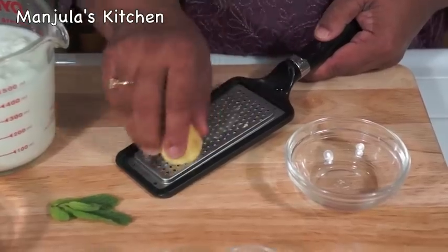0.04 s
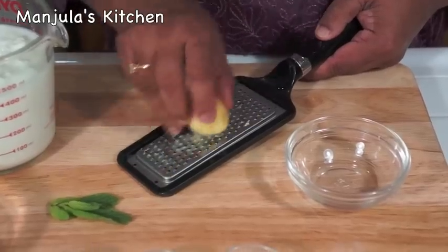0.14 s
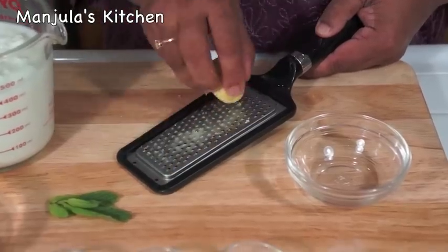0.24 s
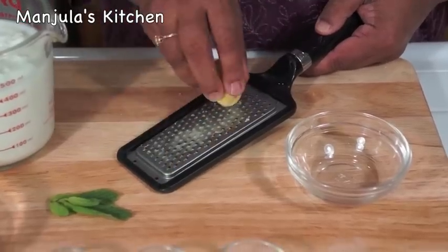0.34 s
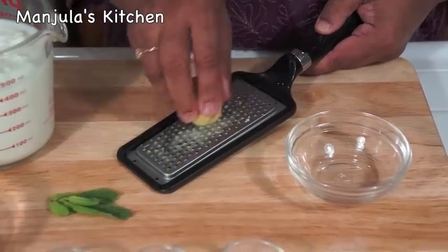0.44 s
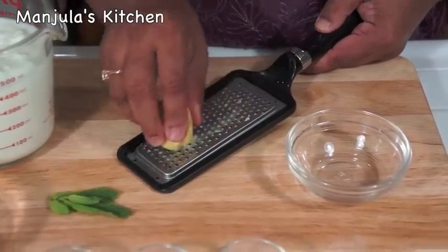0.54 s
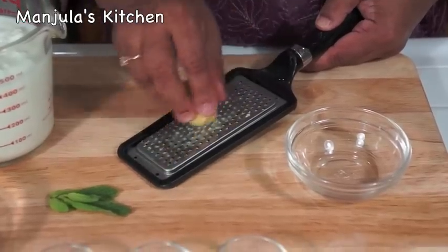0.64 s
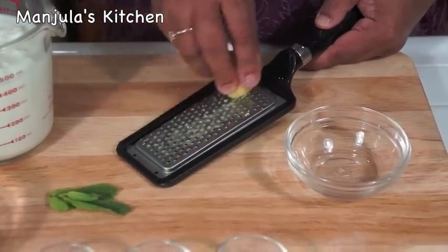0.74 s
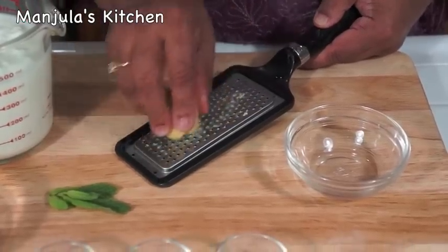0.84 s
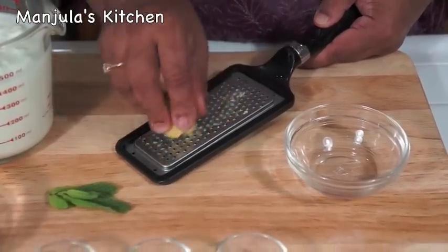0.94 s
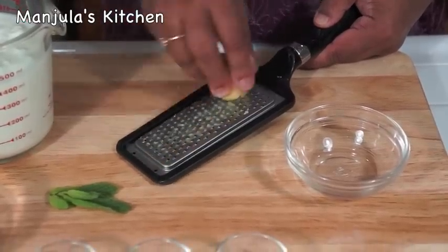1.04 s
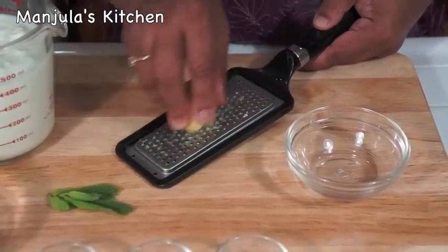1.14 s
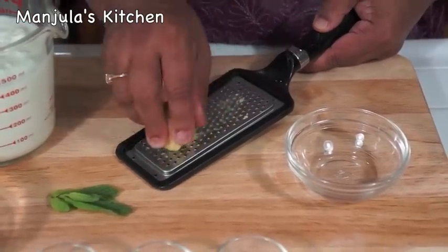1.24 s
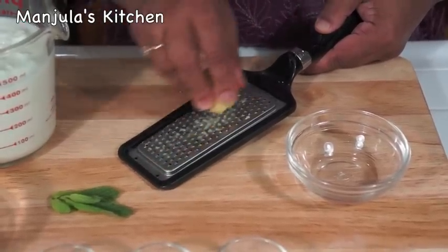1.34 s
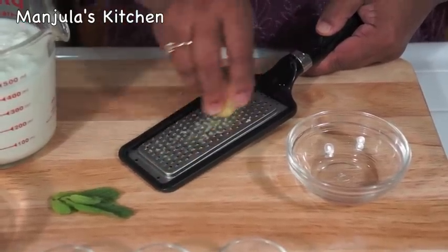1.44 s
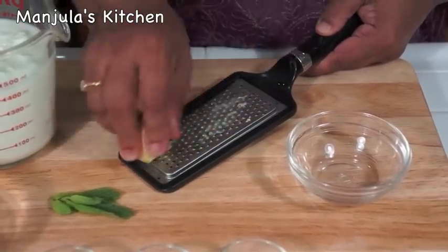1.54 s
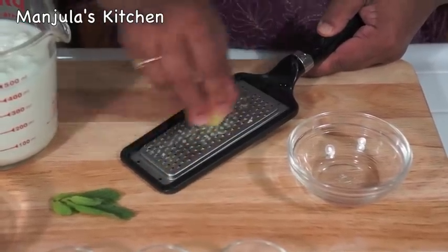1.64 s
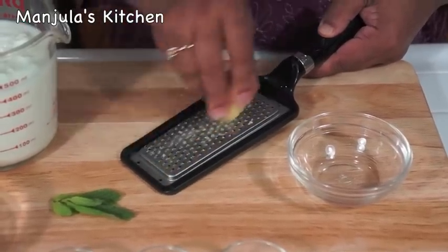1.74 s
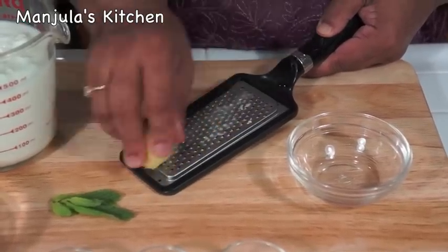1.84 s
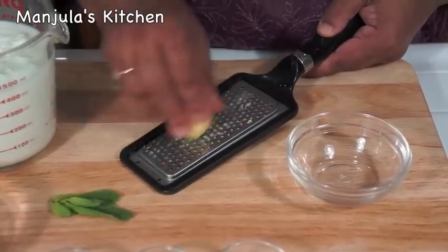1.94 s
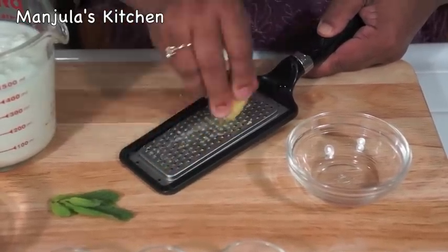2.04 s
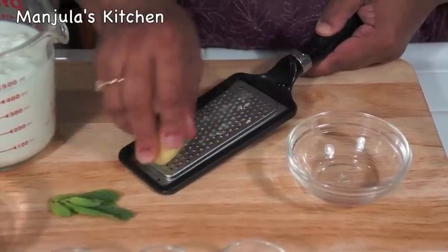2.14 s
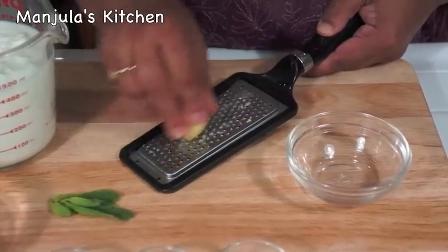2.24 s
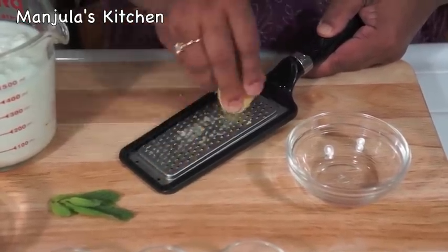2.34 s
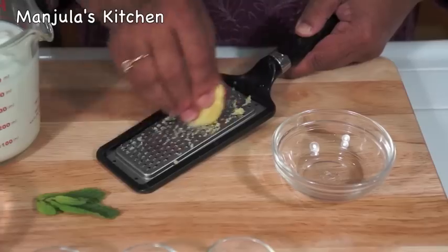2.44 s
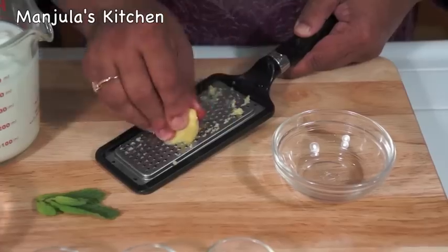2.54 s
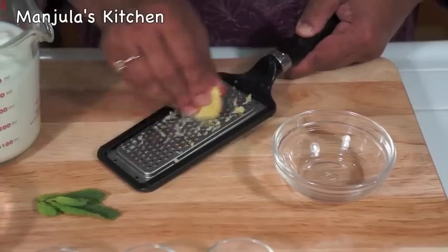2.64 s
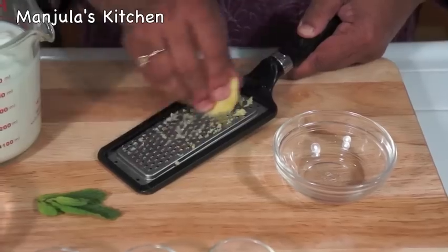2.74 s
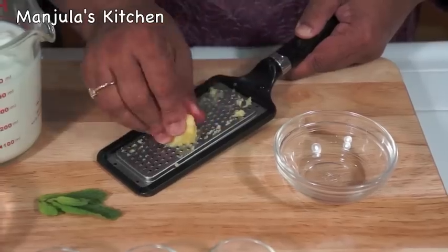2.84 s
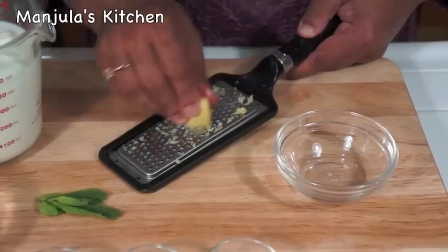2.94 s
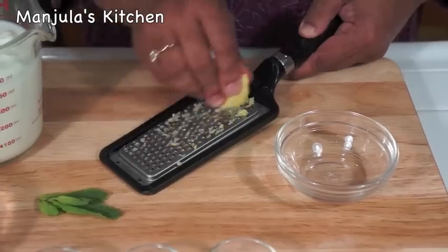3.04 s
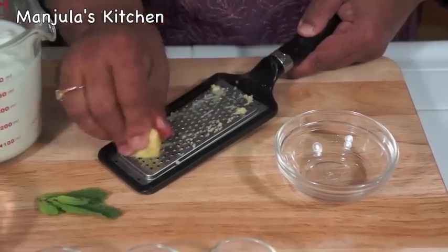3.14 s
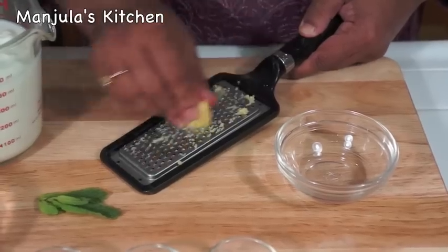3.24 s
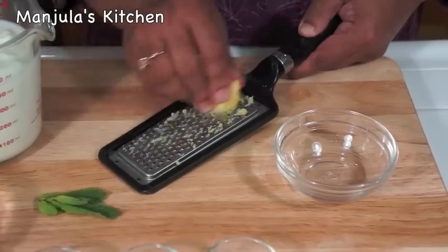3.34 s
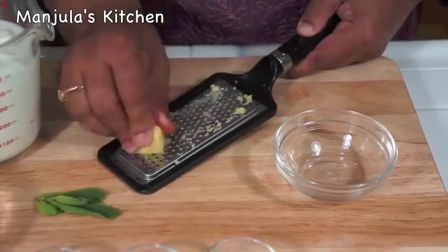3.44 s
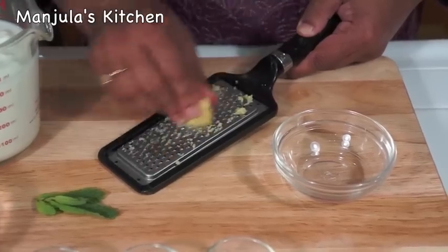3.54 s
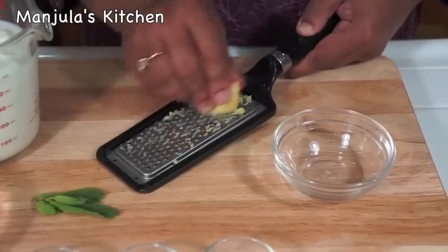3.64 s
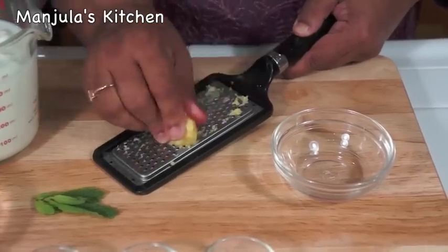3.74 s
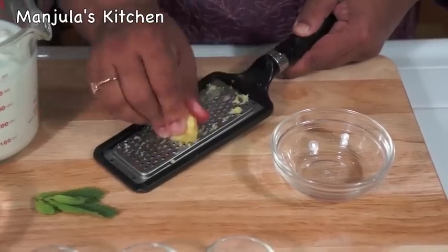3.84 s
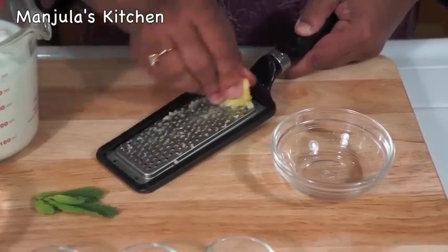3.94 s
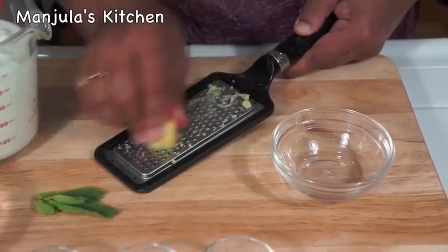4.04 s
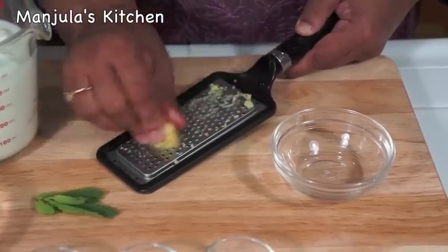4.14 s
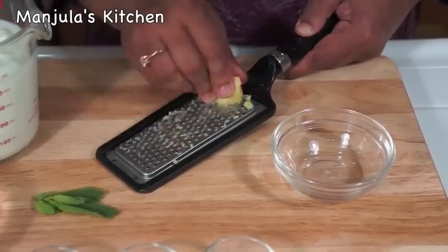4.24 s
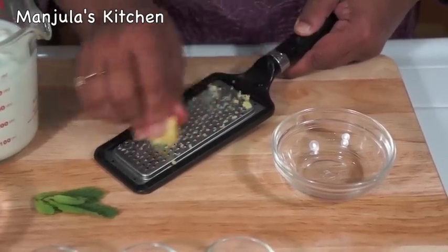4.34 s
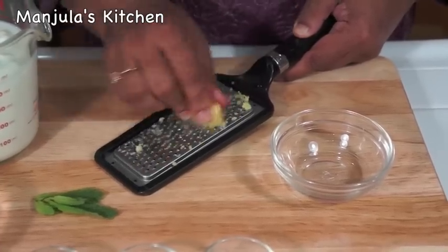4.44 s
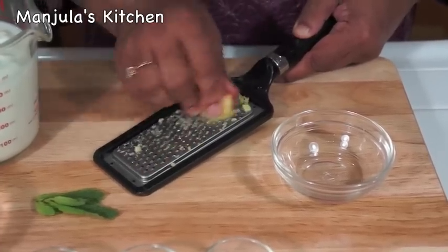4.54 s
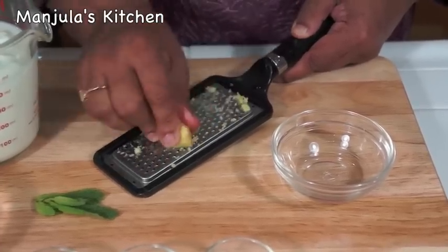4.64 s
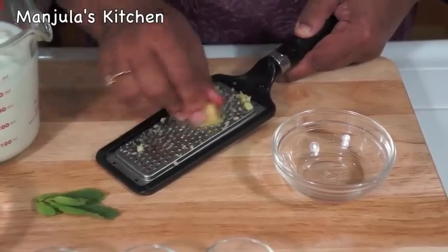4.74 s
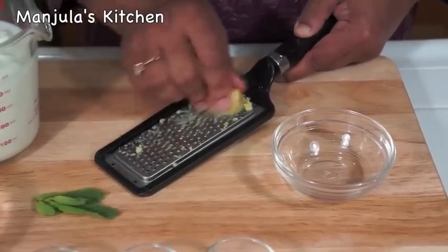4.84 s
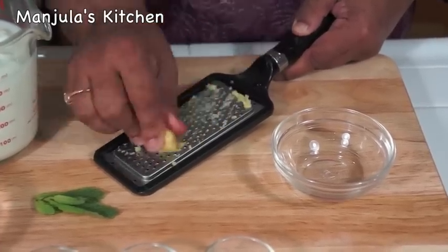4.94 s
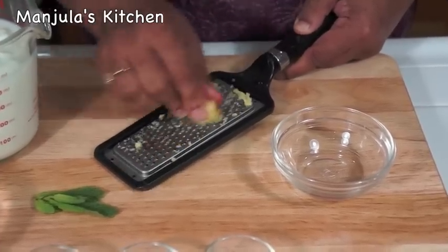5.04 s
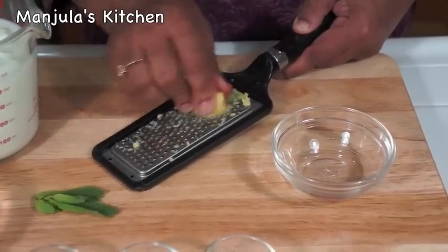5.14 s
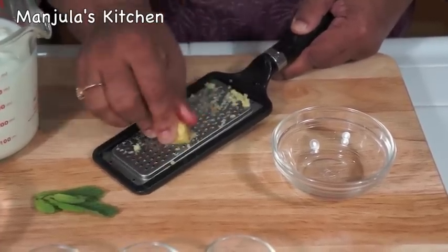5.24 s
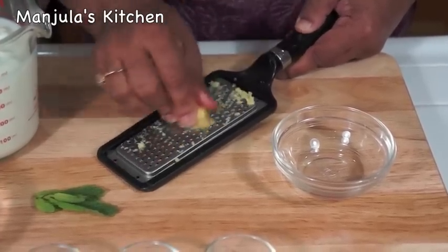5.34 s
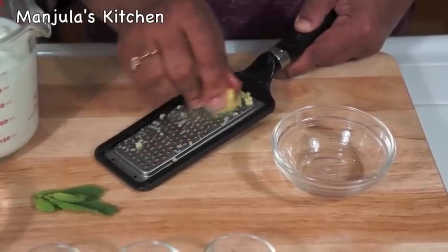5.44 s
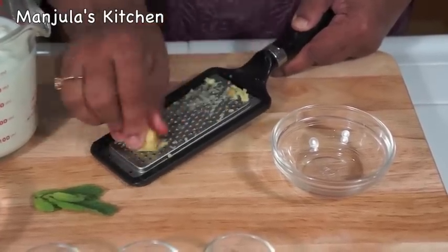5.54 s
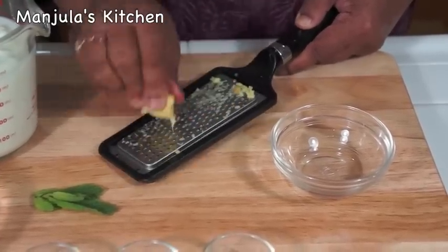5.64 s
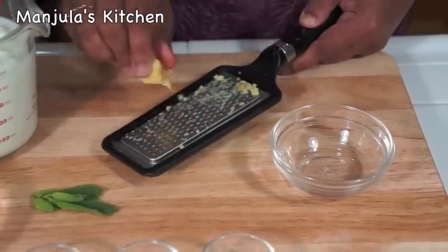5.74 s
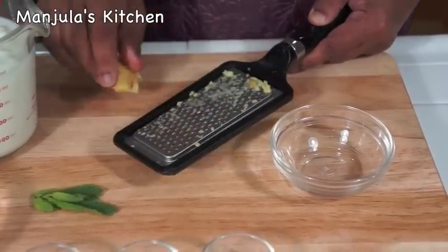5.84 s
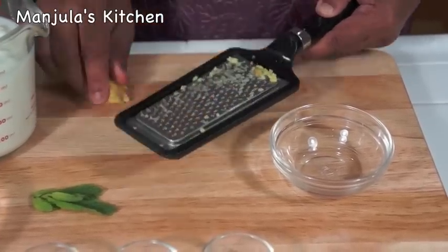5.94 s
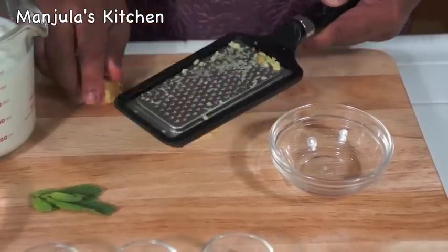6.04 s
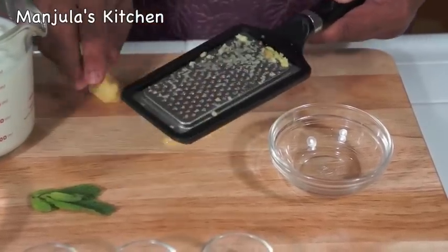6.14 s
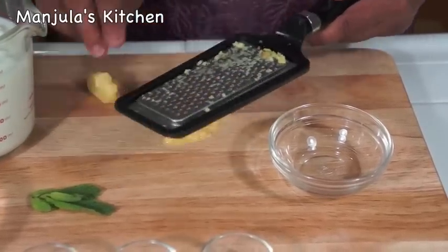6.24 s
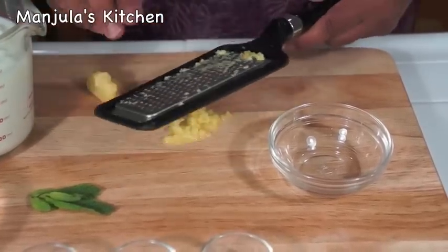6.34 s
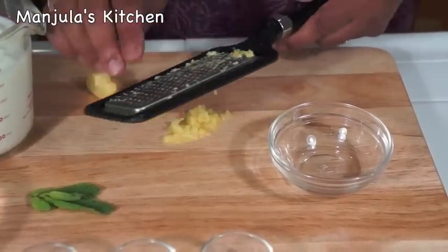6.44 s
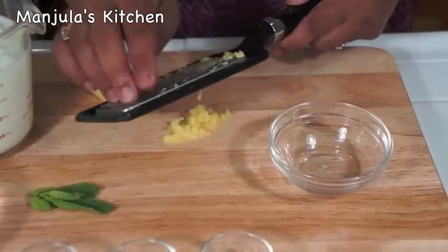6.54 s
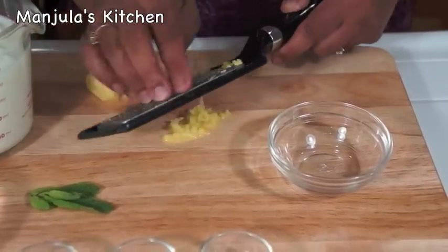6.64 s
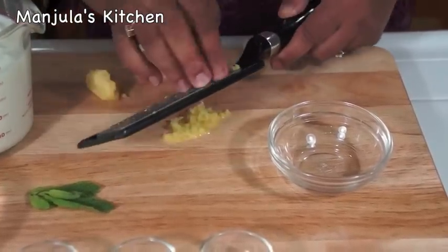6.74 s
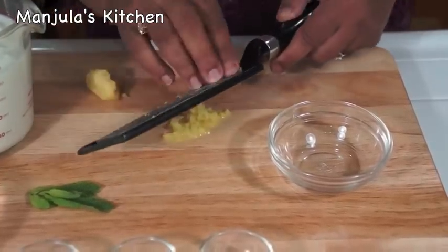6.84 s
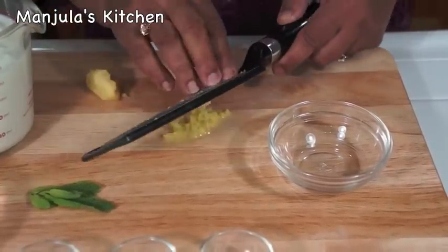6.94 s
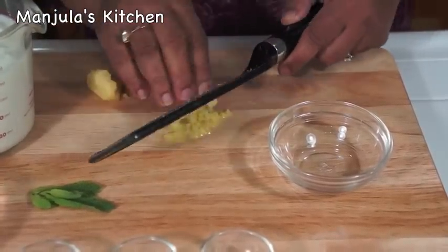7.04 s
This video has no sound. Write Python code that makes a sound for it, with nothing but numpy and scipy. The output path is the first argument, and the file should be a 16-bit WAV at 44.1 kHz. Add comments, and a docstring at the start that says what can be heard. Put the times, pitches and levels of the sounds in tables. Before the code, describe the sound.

In a small quiet kitchen, close stereo microphones catch ginger being rubbed on a fine steel rasp whose tip rests on a wooden board. From 0 to 2.4 seconds, short gritty scrapes come about every third of a second, with lighter grazes between and sharp metallic knocks near 0.07, 1.4, 2.0 and 2.3. The sound dips very briefly at 2.5. From 2.7 to 5.5 the strokes are stronger and fuller, back and forth almost continuously, with dense ticking fibres, bright tinny ringing and a slight low thud; another tiny dip falls near 4.45. Knocks mark 4.9 and 5.5, then a hollow bump at 5.63. Scraping stops; faint board touches follow around 5.8 to 6.15 over soft hiss with barely audible thin whines. From 6.7 to the end near 7, fingers faintly brush and click on the lifted metal.

```python
"""Ginger on a steel rasp

A piece of ginger is rubbed down and up a fine steel rasp whose tip rests on a wooden board, in a small kitchen.
Teeth tear fibres in dense random ticks that ring modes of board, frame, plate and teeth; the root knocks as it lands.
Then the rasp is lifted and fingers brush its back, over a quiet filtered-noise hiss with two thin whines."""
import sys
import numpy as np
from scipy import signal
from scipy.fft import rfft, irfft, next_fast_len
from scipy.io import wavfile
from scipy.ndimage import uniform_filter1d

SR = 44100
rng = np.random.default_rng(int(sys.argv[2]) if len(sys.argv) > 2 else 0)


def natural_amplitude(level_db):
    """Convert a level in decibels to a linear amplitude factor, elementwise."""
    exponent = np.asarray(level_db, float) / 20
    return 10 ** exponent


def to_wav(sig):
    """Store sig (one row per channel, or 1-D mono) as 16-bit WAV at the path in sys.argv[1].

    Samples outside -1..1 are clipped; the rate is SR.
    """
    pcm = np.clip(np.atleast_2d(sig), -1, 1) * 32767
    pcm = np.round(pcm).astype(np.int16)
    wavfile.write(sys.argv[1], SR, pcm.T)  # frames by channels


N = 312326
TIME = np.arange(N) / SR
SIZE = next_fast_len(N + SR)
FREQ = np.arange(SIZE // 2 + 1) * SR / SIZE + 1e-3

# root or fingers striking the rasp; levels before offsets:
# start_s, teeth_db, frame_and_board_db, contact_ms, ping_hz
KNOCKS = [(0.0686, -14, -30, 2.6, 1250), (0.3984, -38, -68, 2.2, 7120), (0.4383, -27, -37, 2.9, 2930),
          (0.7083, -36, -57, 1.5, 2440), (1.0564, -40, -66, 2.5, 8370), (1.1066, -30.5, -36, 5.2, 2600),
          (1.4206, -9.5, -31, 4.8, 6490), (1.6955, -30, -42, 2.7, 2500), (2.0321, -7, -30, 2.5, 6645),
          (2.3311, -5, -26.5, 2.57, 6500), (2.7422, -36, -44.5, 2.5, 8160), (4.4803, -32.5, -53, 3.4, 2450),
          (4.5506, -44, -43, 3.6, 6790), (4.883, -17, -38.5, 2.8, 2450), (5.5174, -11, -36, 1.6, 2620),
          (5.6291, -32, -35, 2.8, 1340), (6.6942, -43, -64, 7.4, 1940), (6.7391, -44, -62, 3.7, 2550),
          (6.8912, -35, -60.5, 2.3, 8820), (6.939, -30, -69, 2.2, 7000), (6.898, -44, -66, 1.7, 9000),
          (6.946, -36, -67, 1.3, 8150), (6.9571, -28, -61, 1.8, 6730), (6.964, -34, -66, 1.3, 6860),
          (6.9853, -34, -56, 1.8, 3200)]
LIFT_S = 6.3  # the rasp leaves the board
LIFTED_BOARD_DB = -21  # board modes are hardly driven from then on


def unit(x):
    """Scale to rms 1."""
    return x / np.sqrt(np.mean(np.abs(x) ** 2))


def shape(points):
    """Gain over frequency from (Hz, dB) points."""
    hz, db = np.transpose(points)
    return natural_amplitude(np.interp(np.log(FREQ), np.log(hz), db))


def through(x, response):
    """Filter by a frequency response."""
    return irfft(rfft(x, SIZE) * response, SIZE)[..., :N]


def causal(gain):
    """Minimum-phase response with the given gain, by folding the cepstrum."""
    fold = irfft(np.log(gain + 1e-9), SIZE)
    fold[1:SIZE // 2] *= 2
    fold[SIZE // 2 + 1:] = 0
    return np.exp(rfft(fold))


def ringing(modes):
    """Response of damped modes (Hz, width Hz, dB), neighbours in opposite phase."""
    total = 0
    for k, (hz, width_hz, db) in enumerate(modes):
        damping = 1j * FREQ * width_hz
        total = total + (-1) ** k * natural_amplitude(db) * damping / (hz ** 2 - FREQ ** 2 + damping)
    return total


def walk(rate_hz):
    """Smoothed random steps, rate_hz of them a second, rms 1."""
    k = int(SR / rate_hz)
    steps = np.repeat(rng.standard_normal(N // k + 1), k)
    return unit(uniform_filter1d(steps, k)[:N])


def tail(t60_s):
    """Room response: a fading burst of noise with unit energy."""
    t = np.arange(SR) / SR
    burst = rng.standard_normal(SR) * np.exp(-np.log(1000) * t / t60_s)
    return rfft(burst / np.sqrt(np.sum(burst ** 2)), SIZE)


def kitchen():
    """Steady noise hiss, side level set by frequency, plus two narrow-band noise whines that waver."""
    # hiss spectrum: hz, relative_density_db
    hiss = [(24, -58), (40, -15), (75, -17.5), (126, -10), (156, -15.5), (310, -4), (540, -7.5), (950, -8),
            (1550, -9.5), (2320, -12), (5270, -15), (9000, -14), (10300, -18.5), (11200, -24)]
    # hiss stereo width: hz, side_minus_mid_db
    hiss_side = [(60, -8), (110, -16), (190, -12), (350, -9), (620, -4), (1110, -5.5), (1990, -3.5),
                 (3570, -3.5), (6410, -4.5), (11500, 0.5)]
    # whines, lower then upper: hz, width_hz
    whines = [(4330, 240), (9630, 45)]
    # the lower whine comes and goes, the upper holds: time_s, lower_db, upper_db
    waver = [(0, -80, -82), (5.75, -75, -80), (6.0, -75, -78), (6.06, -90, -78), (6.12, -75, -78),
             (6.4, -80, -80), (6.6, -90, -82), (6.9, -92, -82)]
    mid, side = (through(rng.standard_normal(N), shape(hiss)) for _ in range(2))
    side = through(side, shape(hiss_side))
    scale = natural_amplitude(-66.5) / np.std(mid)  # mid rms, dB
    time_s, *levels = np.transpose(waver)
    whine = 0
    for (hz, width_hz), db in zip(whines, levels):
        narrow = through(rng.standard_normal(N), ringing([(hz, width_hz, 0)]) ** 2)
        whine = whine + natural_amplitude(np.interp(TIME, time_s, db)) * unit(narrow)
    return scale * np.array([mid + side, mid - side]) + whine


def low_thud(force):
    """The teeth's tearing and knocks also stir a low thud in two modes, near 73 and 157 Hz."""
    # thud modes: hz, width_hz, relative_db
    thuds = [(72.6, 23, 0), (157, 96, -2)]
    return natural_amplitude(-46.5) * rfft(force, SIZE) * unit(ringing(thuds) ** 2)


def thumps():
    """Rasp and root touch the bare board: a short rough contact through three broad resonances."""
    # start_s, level_db, ring_hz, t60_s
    touches = [(5.629, -37, 1350, 0.11), (5.803, -63, 1020, 0.11), (5.967, -55.5, 530, 0.2),
               (5.978, -57.5, 605, 0.16), (6.137, -56, 570, 0.18)]
    out = 0
    for at, db, hz, t60_s in touches:
        t = np.maximum(TIME - at, 0)
        fade = np.exp(-np.log(1000) * t / t60_s) * np.minimum(t / 0.0014, 1)
        push = rng.choice([-1, 1], size=N) * fade
        modes = [(hz, 0.41 * hz, 0), (0.58 * hz, 0.22 * hz, -8), (2.76 * hz, hz, -10)]
        out = out + natural_amplitude(db) * rfft(push, SIZE) * unit(ringing(modes) ** 2)
    return out


def pings():
    """Each blow rings the patch of steel right under it: a sine decaying in a few milliseconds."""
    out, t = np.zeros(N + SR), np.arange(1200) / SR
    for at, teeth_db, _, ms, hz in KNOCKS:
        i = int(at * SR)
        envelope = np.exp(-t / (ms / 1000)) * np.minimum(t / 0.0011, 1)
        out[i:i + len(t)] += natural_amplitude(teeth_db - 9) * np.sin(2 * np.pi * hz * t) * envelope
    return rfft(out, SIZE)


def free_plate(force):
    """Off the board the plate rings with fewer, other modes."""
    # hz, width_hz, relative_db
    free = [(1840, 95, -1), (2550, 120, -4), (3600, 300, -10.5), (5070, 200, -9.5)]
    return rfft(force, SIZE) * unit(ringing(free))


def spread(hiss, weight_db):
    """One contact drives board, frame, plate and teeth according to the weight on it."""
    # part of the weight reaching board, frame, plate: ratio
    shares = [1.05, 0.95, 0.13]
    # offset of board, frame, plate: offset_db
    offsets = [-1, -1.5, -3]
    levels = [share * weight_db + db for share, db in zip(shares, offsets)]
    return hiss * natural_amplitude(np.array(levels + [np.zeros(N)]))


def cuts():
    """Power of the cutting strokes: a cut bites, holds, lets go, and leaves a faint slower drag."""
    # start_s, length_s, tooth_hiss_db, release_db_per_s, frame_and_board_weight_re_hiss_db
    cutting = [(-0.088, 0.13, -36.5, 155, -0.5), (0.41, 0.122, -38.5, 187.0, -3.6),
               (0.771, 0.089, -34.5, 186.0, -5), (1.103, 0.092, -36, 182, -4.5),
               (1.418, 0.13, -36, 212, -2.5), (1.739, 0.11, -35, 237, -3.8), (2.029, 0.14, -37, 241, -2.9),
               (2.328, 0.089, -36, 306, -3.5), (2.737, 0.082, -31, 222, -1.9),
               (3.058, 0.069, -30.5, 176, -5.5), (3.343, 0.098, -33, 311, -4.5),
               (3.646, 0.066, -30, 224.5, -4), (3.994, 0.099, -33, 273.0, -5.5),
               (4.283, 0.088, -32.5, 379.0, -6), (4.543, 0.079, -32, 245, -6),
               (4.846, 0.084, -31.5, 210, -8.7), (5.138, 0.088, -32.5, 234, -10),
               (5.454, 0.092, -33.5, 250, -9.5)]
    bite_s, bite_curve, bite_db, landing_bite_db, landing_s = 0.04, 2.03, -22, -10, 0.005
    drag_db, drag_db_per_s = -22, 56
    # until lands_until_s the root is lifted and set down, weight and all; later the weight arrives late
    lands_until_s, landed_load_db, late_load_db, load_s = 2.49, -2, -9.5, 0.082
    linger_db_per_s, linger_most_db = 9, 0.3  # weight stays on while the teeth let go
    power = np.zeros((4, N))
    for start, length, db, release, weight_db in cutting:
        t = TIME - start
        after = np.maximum(t - length, 0)
        # a cut beginning on a knock starts stronger
        landing = any(abs(knock[0] - start) < landing_s for knock in KNOCKS)
        first_db = landing_bite_db if landing else bite_db
        bite = first_db * np.clip(1 - t / bite_s, 0, 1) ** bite_curve
        fall = np.hypot(natural_amplitude(-release * after), natural_amplitude(drag_db - drag_db_per_s * after))
        hiss = (t > 0) * natural_amplitude(db + bite) * fall
        first_load_db = late_load_db if start > lands_until_s else landed_load_db
        load_db = first_load_db * np.clip(1 - t / load_s, 0, 1)
        load_db = load_db + np.minimum(linger_db_per_s * after, linger_most_db)
        power += spread(hiss, weight_db + load_db) ** 2
    return power


def grazes():
    """Power of light grazes of the root on its way back, then of fingers: each swells and fades."""
    # peak_s, rise_s_per_20_db, fall_s_to_minus_20_db, hiss_db, weight_db
    brushes = [(0.412, 0.038, 0.044, -47, -18), (0.725, 0.028, 0.063, -46, -10.9),
               (1.06, 0.0081, 0.1, -48.5, -16), (1.702, 0.026, 0.08, -42, 3),
               (2.496, 0.016, 0.228, -42, -0.6), (2.696, 0.15, 0.072, -44, -14),
               (3.014, 0.1, 0.08, -39.5, -15), (3.302, 0.16, 0.05, -37.0, -7.5),
               (3.602, 0.25, 0.08, -40, -6.4), (3.949, 0.084, 0.24, -43.1, -6.5),
               (4.236, 0.17, 0.1, -37.5, -6), (4.486, 0.037, 0.1, -49.5, -9),
               (4.801, 0.11, 0.07, -39, -13.0), (5.096, 0.17, 0.04, -38.5, -15.5),
               (5.407, 0.106, 0.0838, -42, -13.5), (5.633, 0.081, 0.18, -59, 13.5),
               (6.746, 0.12, 0.13, -60.5, -4), (6.96, 0.062, 0.131, -53.4, -13),
               (7.03, 0.121, 0.2, -56, -25), (7.046, 0.015, 0.031, -47.5, -36)]
    power = np.zeros((4, N))
    for peak, rise, fall, db, weight_db in brushes:
        t = TIME - peak
        away = np.where(t < 0, -t / rise, (np.abs(t) / fall) ** 0.8)
        power += spread(natural_amplitude(db - 20 * away), np.full(N, weight_db)) ** 2
    return power


def strokes():
    """Strength of the tearing on board, frame, plate and teeth."""
    strength = np.sqrt(cuts() + grazes())
    strength[0] *= np.where(TIME > LIFT_S, natural_amplitude(LIFTED_BOARD_DB), 1)
    return strength


def tearing(rate_hz, spread_db):
    """Teeth catch fibres at random moments with uneven force."""
    catch = rng.random(N) < rate_hz / SR
    force = natural_amplitude(spread_db * np.minimum(rng.exponential(size=N), 5.5))
    return unit(catch * force * rng.choice([-1, 1], size=N))


def add_knocks(forces):
    """A knock is a rattle of contact, gone in milliseconds; the slow modes feel it as one push."""
    plate_like_teeth = 0.38  # the plate takes a blow between what teeth and frame take
    t = np.arange(1200) / SR
    for at, teeth_db, frame_db, ms, _ in KNOCKS:
        envelope = np.exp(-t / (ms / 1000)) * np.minimum(t / 0.00082, 1)
        rattle = rng.choice([-1, 1], size=(2, len(t))) * envelope
        i = int(at * SR)
        plate_db = frame_db + plate_like_teeth * (teeth_db - frame_db)
        fast = natural_amplitude(np.array([plate_db - 1.5, teeth_db - 13]))
        forces[2:, :, i:i + len(t)] += fast[:, None, None] * rattle
        board_db = frame_db + 24.7 + LIFTED_BOARD_DB * (at > LIFT_S)
        forces[:2, :, i + 20] += natural_amplitude(np.array([board_db, frame_db + 24]))[:, None]


def contacts():
    """Forces on board, frame, plate and teeth; of each a pair, since different teeth reach mid and side."""
    # the holding hand shifts the load: time_s, frame_over_board_db
    grip = [(0.1, 4.5), (0.8, 3), (1.2, 3), (1.8, -1), (2.3, -2), (2.7, -1), (3.7, -2), (4.2, -0.5),
            (4.8, -3.5), (5.5, -1.5), (5.62, 5.5), (5.85, 0)]
    # the root stutters, so the ticks come in patches
    patches = natural_amplitude(1.16 * walk(35) + 0.5 * walk(140))
    ticks = np.array([tearing(9000, 2.3) for _ in range(3)])
    pairs = np.array([ticks[:2], ticks[:2], ticks[1:], ticks[::2]])
    forces = (strokes() * patches)[:, None] * pairs
    add_knocks(forces)
    grip_db = np.interp(TIME, *np.transpose(grip))
    forces[:2] *= natural_amplitude(np.array([-grip_db, grip_db]) / 2)[:, None]
    return forces


def rasp(forces):
    """Mid and side spectra: modes swing with the contact point, radiate in own phases; a smooth crowd between."""
    # modes of each part: hz, width_hz, relative_db
    board = [(411, 12, -26.5), (513.6, 26, -4), (621.5, 51, -17), (717.8, 24.7, -7), (825.6, 24.7, 0.5),
             (892, 16, -11.5)]
    frame = [(990, 30.6, -5), (1086, 38, -14), (1272.6, 81, -3.5), (1388, 50, -5), (1690, 6.8, -31),
             (1840, 7.8, -15.5)]
    plate = [(2133, 31, -2.5), (2300, 23, -8), (2450, 31, 2), (2520, 36, 0), (2747, 57, -5), (2870, 40, 4),
             (2930, 8.5, -22), (3445, 29, 1)]
    teeth = [(4066, 46, -5), (4970, 150, -6.5), (6242, 103, 7), (6515, 170, 0), (7124, 70, 0),
             (7122, 42, 5.5), (7940, 26, -1), (8600, 26, 6), (9080, 25, -19)]
    # dense modes too close to count: hz, relative_density_db
    between = [(200, -44), (350, -26.5), (500, -9.5), (900, -26), (1400, -8), (1900, -15.5), (2600, -7.5),
               (3700, -11.5), (5000, -8.5), (5700, -9.5), (7000, -5), (9400, -6.5), (10200, -14),
               (11200, -21.5)]
    # their level in board, frame, plate, teeth: re_modes_db
    between_db = [-5, -5.5, 3, 7]
    # borders between the four crowds: hz
    split = [930, 1850, 3900]
    node_db, node_rate_hz = 3, 16  # rms swing of a mode as the contact crosses its nodes
    edges = [0, *split, SR / 2]
    mid, side = 0, 0
    for force, modes, db, lo, hi in zip(forces, (board, frame, plate, teeth), between_db, edges, edges[1:]):
        band = 1 / np.sqrt((1 + (lo / FREQ) ** 10) * (1 + (FREQ / hi) ** 10))
        total = np.sqrt(1 + natural_amplitude(2 * db))
        crowd = natural_amplitude(db) / total * unit(causal(shape(between) * band))
        scale = 1 / total / np.sqrt(np.mean(np.abs(ringing(modes)) ** 2))
        for k, mode in enumerate(modes):
            swung = force[0] * natural_amplitude(node_db * walk(node_rate_hz))
            ring = (-1) ** k * scale * ringing([mode]) * rfft(swung, SIZE)
            mid = mid + ring
            side = side + ring * np.exp(2j * np.pi * rng.random())
        mid = mid + crowd * rfft(force[0], SIZE)
        side = side + crowd * rfft(force[1], SIZE)
    # the small rasp radiates almost nothing below its lowest mode
    small = causal(1 / np.sqrt(1 + (380 / FREQ) ** 6))
    return mid * small, side * small


def scene():
    """Rasp in the room, heard by two close microphones."""
    # left-right balance: hz, left_minus_right_db
    balance = [(60, 7), (110, -6), (190, 1), (350, 1), (620, -0.5), (1110, 0.5), (1990, -1), (3570, -1.5),
               (6410, -0.5), (11500, -4.5)]
    # stereo width: hz, side_gain_db
    width = [(60, -14), (110, -22), (190, -22), (350, -24), (620, -18), (1110, -14.5), (1990, -10),
             (3570, -5.5), (6410, -6.5), (11500, -2)]
    room_t60_s, room_mid_db, room_side_db = 0.32, -10.5, -5
    forces = contacts()
    lifted = TIME > LIFT_S
    free = free_plate(forces[2, 0] * lifted)
    forces[2] *= np.where(lifted, .4, 1)
    mid, side = rasp(forces)
    shared = thumps() + pings() + free + low_thud(forces[3, 0])
    mid = (mid + shared) * (1 + natural_amplitude(room_mid_db) * tail(room_t60_s))
    side = (side + shared) * (1 + natural_amplitude(room_side_db) * tail(room_t60_s)) * shape(width)
    lean = np.sqrt(shape(balance))
    return irfft([(mid + side) * lean, (mid - side) / lean], SIZE)[:, :N] + kitchen()


def top_cut(x):
    """Nothing passes above the cut-off."""
    return signal.sosfilt(signal.butter(12, 12090, fs=SR, output="sos"), x)


def record(dry):
    """Two brief dips in level, then a steep treble cut."""
    # the whole sound fades out and in: centre_s, half_length_s, least_gain
    dips = [(2.492, 0.032, 0.1), (4.459, 0.047, 0.037)]
    gain = np.ones(N)
    for at, half, least in dips:
        gain *= np.clip(np.abs(TIME - at) / half, least, 1)
    low_pass = signal.ellip(12, .2, 62, 11080, fs=SR, output="sos")  # ripple dB, stop dB, edge Hz
    mix = signal.sosfilt(low_pass, dry * gain)
    return top_cut(mix)


dry = scene()
out = record(dry)
to_wav(out)
```